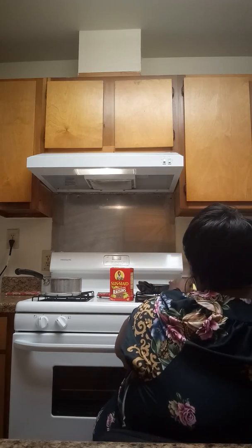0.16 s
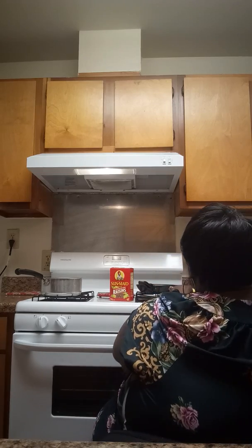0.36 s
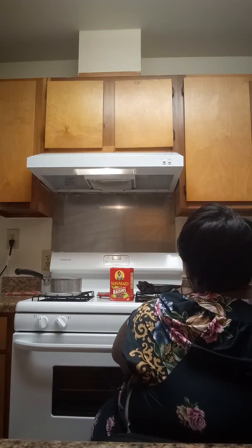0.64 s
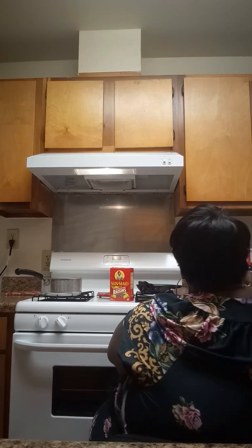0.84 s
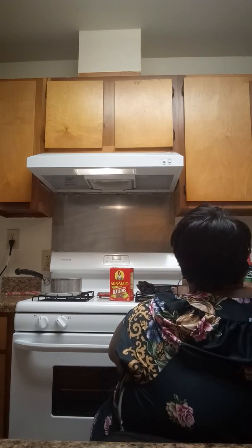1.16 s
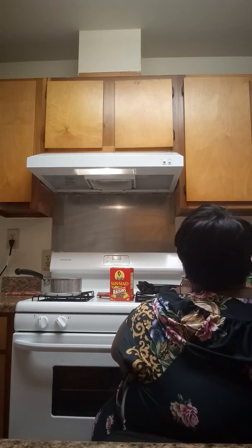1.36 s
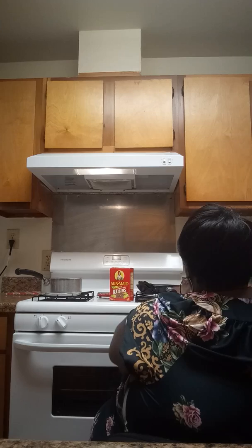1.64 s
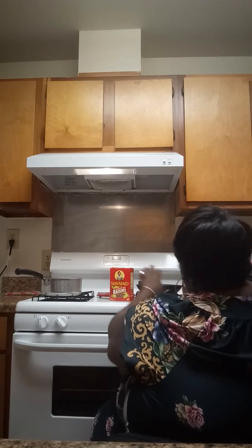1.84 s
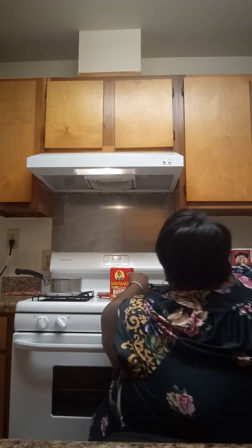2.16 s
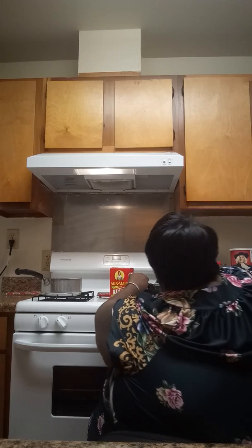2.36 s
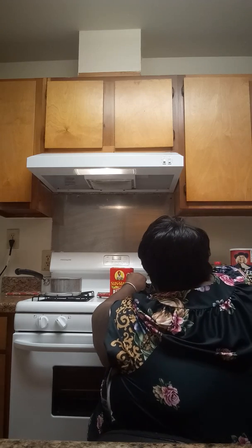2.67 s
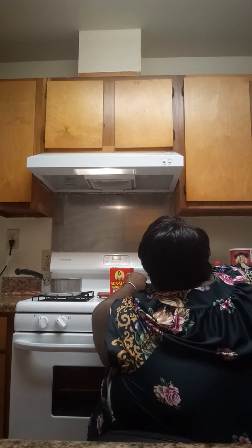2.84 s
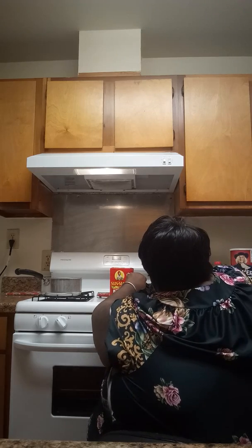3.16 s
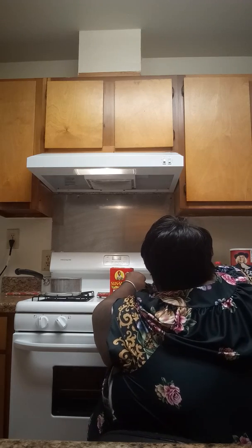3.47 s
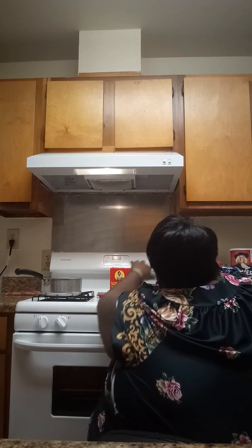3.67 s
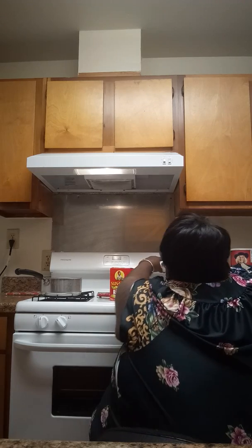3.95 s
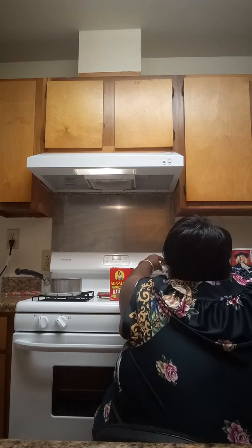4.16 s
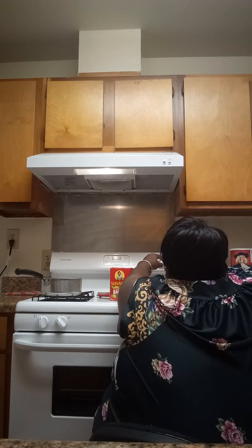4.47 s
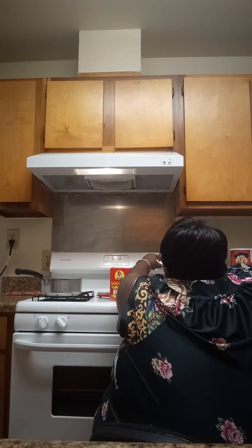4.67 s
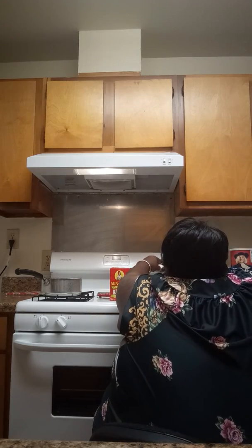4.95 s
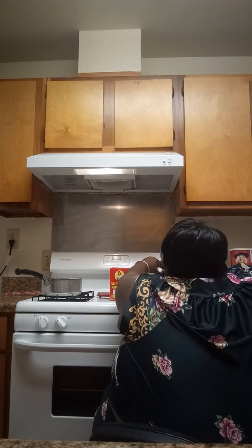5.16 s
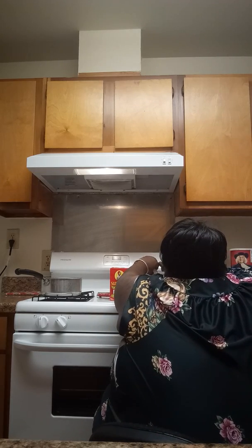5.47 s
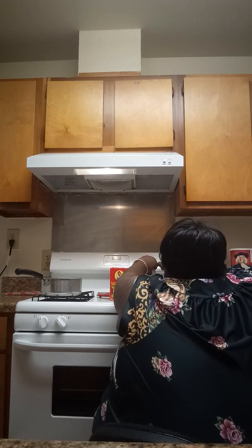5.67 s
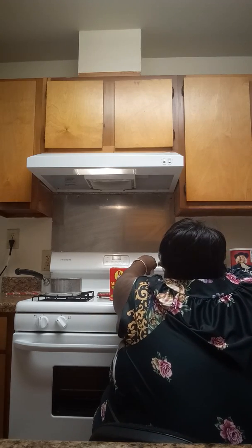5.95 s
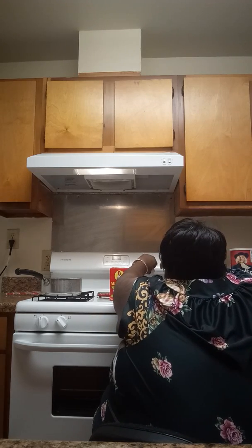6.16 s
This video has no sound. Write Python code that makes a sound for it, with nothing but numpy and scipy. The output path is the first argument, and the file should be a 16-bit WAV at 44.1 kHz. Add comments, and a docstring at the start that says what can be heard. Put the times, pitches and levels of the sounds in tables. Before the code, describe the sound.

In a small hard kitchen, a soft air rush and faint appliance hum run throughout. Light finger and shell taps lead to a sharp clink, then three groups of egg knocks crunch on a dish rim and make it ring briefly. The dish scrapes shortly, small ticks follow, and a bright grainy hiss sets in to the end. The microphone stands behind the cook, so cracks arrive softened and echoey.

```python
"""Eggs knocked on a dish rim

Eggs are handled and knocked on a dish on a stove in a small hard kitchen, heard from behind the cook. The body
screens the direct crack, which comes mostly by way of the echoes; struck modes of the dish swell up and ring.
Short noise spatters are taps of shell and fingers, and contacts of the dragged dish; short rings are ticks.
The dish is dragged in a train of slips, then a grainy noise hiss sets in. Below lie appliance hum and a soft
rush of noise; both channels are the same."""
import sys
import numpy as np
from scipy import signal
from scipy.fft import rfft, irfft
from scipy.io import wavfile

SR = 44100
rng = np.random.default_rng(int(sys.argv[2]) if len(sys.argv) > 2 else 0)


def master(y):
    """Save y as 16-bit WAV."""
    cut = np.clip(np.atleast_2d(y).T, -1, 1)
    pcm = np.round(cut * 32767)  # scale
    wavfile.write(sys.argv[1], SR, pcm.astype(np.int16))


N = 278491


def from_db(db):
    """Decibels to amplitude gain."""
    return 10 ** (np.asarray(db) / 20)


def rms_one(x):
    """Scale to rms 1."""
    return x / np.sqrt(np.mean(x ** 2) + 1e-20)


def in_time(rows):
    """Columns of a curve table, interpolated at every sample."""
    s, *columns = np.transpose(rows)
    return [np.interp(np.arange(N) / SR, s, column) for column in columns]


def at_hz(points, hz):
    """Read a table on a log-frequency axis."""
    table_hz, values = np.transpose(points)
    return np.interp(np.log(hz), np.log(table_hz), values)


def drift(rate_hz):
    """Slow random curve of rms 1: noise through two equal poles, on a grid of 40 samples."""
    r = np.exp(-80 * np.pi * rate_hz / SR)
    noise = rng.standard_normal(N // 40 + 2002)
    slow = signal.lfilter([1], [1, -2 * r, r * r], noise)[2000:]  # start-up dropped
    return np.interp(np.arange(N) / 40, np.arange(len(slow)), rms_one(slow))


def fade(start_s, rise_s):
    """Gain that rises exponentially from 0 towards 1 after a moment."""
    return 1 - np.exp(-np.maximum(np.arange(N) / SR - start_s, 0) / rise_s)


def colour(x, spectrum, unit_energy=True):
    """Causal minimum-phase filter with the given spectrum, by folding its cepstrum."""
    hz = np.maximum(np.arange(8193) * SR / 16384, 1)
    cepstrum = irfft(np.log(from_db(at_hz(spectrum, hz))))
    cepstrum[1:8192] *= 2
    cepstrum[8193:] = 0
    pulse = irfft(np.exp(rfft(cepstrum)))[:8192]
    if unit_energy:
        pulse = pulse / np.sqrt(np.sum(pulse ** 2))
    return signal.oaconvolve(x, pulse)[:N]


def split(x, hz):
    """Parts below and above a frequency."""
    return [signal.sosfilt(signal.butter(4, hz, kind, fs=SR, output="sos"), x) for kind in ("low", "high")]


def clicks(times_s, db):
    """Single-sample clicks of given levels."""
    out = np.zeros(N)
    out[np.round(np.asarray(times_s) * SR).astype(int)] = from_db(db)
    return out


def burst(x, length_s):
    """Each click becomes exponentially dying noise."""
    r = np.exp(-1 / (length_s * SR))
    return signal.lfilter([1], [1, -r], x + 1e-18) * rng.standard_normal(N)


def ring(x, hz, t60_s):
    """A damped mode: a unit click sets a sine of height 1 ringing."""
    r = from_db(-60 / (t60_s * SR))
    w = 2 * np.pi * hz / SR
    return signal.lfilter([0, np.sin(w)], [1, -2 * r * np.cos(w), r * r], x + 1e-18)


def resonance(x, hz, width_hz):
    """Two-pole band with gain 1 at its peak."""
    r = np.exp(-np.pi * width_hz / SR)
    top = np.array([1, 0, -1]) * (1 - r * r) / 2
    return signal.lfilter(top, [1, -2 * r * np.cos(2 * np.pi * hz / SR), r * r], x)


def narrow(hz, width_hz):
    """Noise through one damped mode; rms 1."""
    t60_s = np.log(1000) / (np.pi * width_hz)
    return rms_one(ring(rng.standard_normal(N), hz, t60_s))


def wavering(hz, width_hz, wander):
    """Noise band whose centre wanders by a share of its frequency; rms about 1."""
    phase = 2 * np.pi * np.cumsum(hz * (1 + wander * drift(2.5))) / SR
    return drift(width_hz) * np.cos(phase) + drift(width_hz) * np.sin(phase)


# Steady motor tones. Each row: frequency in Hz, mean level in dB rms.
MOTOR_TONES = [(59.5, -79), (151, -65)]
# Noisy motor bands. Each row: centre in Hz, width in Hz, level in dB rms.
MOTOR_BANDS = [(121, 6.9, -72.5), (721, 3, -62), (1413, 6.8, -58)]


def motor():
    """Appliance hum: sines drifting slightly in level and phase, plus narrow noise bands."""
    t = np.arange(N) / SR
    out = np.zeros(N)
    for hz, db in MOTOR_TONES:
        gain = np.sqrt(2) * from_db(db + 0.95 * drift(2.8))
        out += gain * np.sin(2 * np.pi * hz * t + 0.5 * drift(3.4))
    for hz, width_hz, db in MOTOR_BANDS:
        out += from_db(db) * narrow(hz, width_hz)
    return out


RUSH_DB, RUSH_TREBLE_DB, RUSH_SWAY_DB = -37, -1, 1.64
# Spectrum of the rush. Each row: frequency in Hz, relative density in dB per Hz.
RUSH_SPECTRUM = [(20, -37), (100, -26.5), (135, -12), (200, -5), (300, -8), (460, -1.5), (1100, -0.5),
                 (1500, 0), (2600, -5.5), (4600, 0.5), (6400, -3.5), (9000, -2.5), (16000, -4.5)]


def rush():
    """Air and appliance noise: shaped noise whose treble flickers in three bands."""
    low, high = split(colour(rng.standard_normal(N), RUSH_SPECTRUM), 2150)
    high, top = split(high, 16700)
    patch_1, rest = split(high, 3770)
    patch_2, patch_3 = split(rest, 4870)
    shared_db = 0.9 * drift(5)
    treble = sum(from_db(shared_db + 1.26 * drift(33)) * patch for patch in (patch_1, patch_2, patch_3))
    air = from_db(0.41 * drift(4.2)) * low
    air += from_db(RUSH_TREBLE_DB + RUSH_SWAY_DB * drift(1.0)) * treble
    air += from_db(0.4 * drift(8)) * top
    return from_db(RUSH_DB) * air


HISS_START_S, HISS_ATTACK_S, HISS_DB, HISS_FADE_DB_PER_S = 5.148, 0.018, -35, 5
# Hiss balance. Each row: time in s, treble in dB against the body, highest band in dB against the treble.
HISS_BALANCE = [(5.14, 6.5, 19), (5.2, 8.5, 3.5), (5.29, 12.5, -1.5), (5.4, 8, -6), (5.46, 4, -7),
                (5.52, 6, -4), (5.67, 7, 4), (6.0, 5.5, 4), (6.32, 2, 4.5)]
# Spectrum of the grainy noise. Each row: frequency in Hz, relative density in dB per Hz.
HISS_SPECTRUM = [(200, -31), (500, -30), (760, -17), (900, 6), (1120, -4.5), (1400, 0.5), (1800, 0),
                 (2700, -4.5), (3600, -2.5), (4700, 0.5), (6400, -0.5), (9000, -4), (16000, -1)]
# Hollow resonances. Each row: centre in Hz, width in Hz, level in dB against each other.
HISS_HOLLOWS = [(905, 53, -1.5), (1410, 71, 0), (1778, 42, 1), (2180, 110, -2.5), (3610, 200, 1.5),
                (4700, 240, 3), (6420, 180, -2)]


def hiss():
    """Escaping gas or steam: bright noise with hollow resonances that waver and flicker."""
    treble_db, top_db = in_time(HISS_BALANCE)
    body_db = HISS_DB - HISS_FADE_DB_PER_S * (np.arange(N) / SR - HISS_START_S)
    hollows = np.zeros(N)
    for hz, width_hz, db in HISS_HOLLOWS:
        hollows += from_db(db + 2.5 * drift(7.3)) * wavering(hz, width_hz, wander=0.03)
    noise = colour(rng.standard_normal(N), HISS_SPECTRUM)
    body, treble = split(noise + from_db(-17) * hollows, 3200)
    treble, top = split(rms_one(treble), 7800)
    jet = rms_one(body) + from_db(treble_db + 0.5 * drift(7.1)) * (treble + from_db(top_db) * top)
    level = from_db(body_db + 0.41 * drift(13.4) + 0.23 * drift(70))
    return level * jet * fade(HISS_START_S, HISS_ATTACK_S)


DRAG_ATTACK_S, DRAG_RELEASE_S, JUDDER_HZ, JUDDER_DB = 0.0045, 0.017, 37.1, 2.5
# Drag of the dish. One row: start in s, stop in s, level in dB rms before judder and fades.
DRAG_STROKE = (3.70, 3.955, -34)
# Spectrum of the drag. Each row: frequency in Hz, relative density in dB per Hz.
DRAG_SPECTRUM = [(210, -27), (450, -10.5), (800, -1), (1230, -6.5), (1650, 1.5), (2800, -16.5), (5240, -19),
                 (16000, -22)]


def drag():
    """Dense uneven slips of the dish foot on enamel, their level swung by an unsteady judder."""
    start_s, stop_s, db = DRAG_STROKE
    sizes = from_db(2.5 * np.minimum(rng.exponential(1, N), 4))
    struck = rng.random(N) < 2500 / SR  # 2500 slips per second on average
    slips = struck * sizes * rng.choice([-1, 1], N)
    judder = np.sin(2 * np.pi * np.cumsum(JUDDER_HZ * (1 + 0.206 * drift(7.9))) / SR)
    stroke = fade(start_s, DRAG_ATTACK_S) * (1 - fade(stop_s, DRAG_RELEASE_S))
    return from_db(db + JUDDER_DB * judder) * stroke * rms_one(colour(slips, DRAG_SPECTRUM))


TICK_OVERTONE_RATIO, OVERTONE_DB = 1.68, -4
# Hard little ticks. Each row: time in s, note in Hz, level of the note in dB, t60 in s,
# echo feed in dB against the direct tick.
TICK_NOTES = [(2.04, 1862, -21, .2, -17), (2.043, 6510, -22, 0.027, -13), (4.181, 4930, -26, 0.0066, -3),
              (4.940, 1400, -23.5, 0.0099, 6), (4.998, 1020, -32, 0.054, -6), (5.102, 1243, -28, 0.1, -11),
              (6.2621, 1900, -17.5, 0.017, -23)]


def ticks():
    """Clicks ring a note and a faster-dying overtone; returns direct sound and echo feed."""
    out = np.zeros((2, N))
    for at_s, hz, db, t60_s, echo_db in TICK_NOTES:
        blow = clicks([at_s], db)
        note = ring(blow, hz, t60_s)
        note += from_db(OVERTONE_DB) * ring(blow, hz * TICK_OVERTONE_RATIO, t60_s / 3.4)
        note = split(note, hz / 2)[1]
        out += note * from_db([[0], [echo_db]])
    return out


TAP_WIDTH_SHARE = 0.38  # band width over centre
TAP_ECHO_DB, SNAP_ECHO_DB = -9, -7.5  # what reaches the walls
# Short noise spatters: taps of shell and fingers, and contacts of the dragged dish.
# Each row: start in s, peak in dB, centre in Hz, time to the envelope's crest in s,
# broad snap in dB against the peak.
TAP_EVENTS = [(0.948, -32.5, 1780, 0.02, -6.5), (1.224, -38.5, 3030, 0.047, -8),
              (1.282, -32.5, 1770, 0.013, 2.5), (1.328, -33, 4500, 0.0064, -12),
              (2.017, -26.5, 1990, 0.009, -4), (2.035, -13, 1740, 0.01, -12.5),
              (2.037, -16, 2840, 0.009, -11), (2.381, -31, 1250, 0.0093, -9), (3.717, -32, 3240, .006, -19),
              (3.835, -33, 4500, 0.0034, -14), (3.918, -38, 4300, 0.0049, 2),
              (3.921, -30, 1090, 0.0072, -15), (4.184, -30, 5160, 0.0073, -19),
              (4.459, -35, 5500, 0.0055, -9), (4.549, -28, 5500, 0.0033, -16),
              (4.577, -37.5, 1610, 0.013, 5.5), (4.779, -30, 4940, 0.01, -20),
              (4.939, -26, 1800, 0.004, -4), (5, -34.5, 1210, 0.0067, 0.5)]
# Spectrum of the snap. Each row: frequency in Hz, relative density in dB per Hz.
SNAP_SPECTRUM = [(300, -20), (600, -30), (900, -6.5), (1850, -3.5), (3000, -5.5), (5500, -4.5), (9000, -7),
                 (16000, -17)]


def taps():
    """Short contacts: noise spatters in a hollow band plus a broad snap; returns direct and echo feed."""
    notes, snaps = np.zeros(N), np.zeros(N)
    t = np.arange(4000) / SR
    for at_s, db, hz, crest_s, snap_db in TAP_EVENTS:
        spatter = rng.standard_normal(len(t)) * t / crest_s * np.exp(1 - t / crest_s)
        width_hz = TAP_WIDTH_SHARE * hz
        note = resonance(resonance(spatter, hz, width_hz), hz, 2 * width_hz)
        first = round(at_s * SR)
        where = slice(first, first + len(t))
        notes[where] += from_db(db) * note / np.abs(note).max()
        snaps[where] += from_db(db + snap_db) * spatter
    snaps = colour(snaps, SNAP_SPECTRUM)
    return notes + snaps, from_db(TAP_ECHO_DB) * notes + from_db(SNAP_ECHO_DB) * snaps


THUD_DB = -25.5  # against the knock


def thud():
    """Each blow shakes the stove and worktop: a faint low noise rumble that dies slowly."""
    s, db, _, _ = np.transpose(BLOWS)
    return split(burst(clicks(s, db + THUD_DB), length_s=0.18), 220)[0]


CONTACT_DB, CONTACT_HZ = -9.5, 620  # level against the knock


def contact():
    """First dull touch of egg on rim: one short mode, heard before the ring has built up."""
    s, db, _, _ = np.transpose(BLOWS)
    return ring(clicks(s, db + CONTACT_DB), CONTACT_HZ, t60_s=0.03)


CRACK_S, CRACK_DELAY_S = 0.007, 0.003
# Egg on the dish rim. Each row: time in s, ring in dB, shell crack in dB against the ring,
# ring tilt in dB per octave about 1 kHz.
BLOWS = [(2.525, -20.5, 6.5, -3), (2.548, -25.5, 3, 2.5), (2.746, -15.5, 5.5, -0.5), (2.794, -26, 13, 9),
         (2.816, -25, 9.5, -8.5), (3.049, -14.5, 5.5, 0), (3.122, -20.5, 14, 6.5), (3.150, -20.5, -8, -4)]
# Modes of the dish and the stove top under it. Each row: frequency in Hz, strength in dB, t60 in s.
DISH_MODES = [(123.6, -29, 0.19), (363, -16.5, 0.14), (462.4, -24, 0.53), (565, -22, 0.12),
              (642, -22, 0.33), (700, -28, 0.15), (808.2, 7, 0.22), (819, -3.5, 0.19), (896, -6, 0.2),
              (1113, 7, 0.07), (1200, -24, 0.45), (1300, -13.5, 0.31), (1364, -11, 0.16), (1405, -4, 0.22),
              (1520, -11.5, 0.18), (1747, -19, 0.5), (1860, -19, 0.32), (2090, -29, .25),
              (2208, -17.5, 0.28), (2350, -22, 0.25), (3420, -16.5, 0.12), (3610, -17, 0.12),
              (5530, -21, 0.063), (5900, -17.5, 0.08)]
# Spectrum of shell giving way. Each row: frequency in Hz, relative density in dB per Hz.
CRACK_SPECTRUM = [(150, -68), (250, -36), (370, -13), (750, -7.5), (1400, -1), (2200, -9.5), (2900, -17),
                  (5700, -15.5), (9000, -17), (16000, -32)]


def knocks():
    """Each blow strikes every mode with a strength of its own; returns swelling ring and shell crack."""
    s, db, crack_db, tilt_db = np.transpose(BLOWS)
    rings = np.zeros(N)
    for hz, mode_db, t60_s in DISH_MODES:
        octaves = np.log2(max(hz, 500) / 1000)  # no further tilt below 500 Hz
        uneven_db = 1.2 * rng.standard_normal(len(s))
        blows = clicks(s, db + mode_db + tilt_db * octaves + uneven_db)
        swell_hz = 35 + 0.019 * hz  # echoes pile up in step, so the ring builds after contact
        mode = ring(blows, hz, t60_s)
        rings += resonance(resonance(mode, hz, swell_hz), hz, swell_hz)
    crack = burst(clicks(s + CRACK_DELAY_S, db + crack_db), length_s=CRACK_S)
    return rings, colour(crack, CRACK_SPECTRUM)


SWELL_S = 0.0042
# Decay of the room. Each row: frequency in Hz, t60 in s.
ROOM_DECAY = [(300, 0.81), (1000, 0.55), (3000, 0.47), (8000, 0.27), (15000, 0.22)]


def kitchen(x):
    """Room echoes: half-octave noise bands swell for some milliseconds, then die, the treble first."""
    t = np.arange(1, SR // 2) / SR
    echoes = np.zeros(len(t))
    edges_hz = 200 * 2 ** np.arange(0, 6.6, 0.5)
    for low_hz, high_hz in zip(edges_hz, edges_hz[1:]):
        band_filter = signal.butter(2, [low_hz, high_hz], "band", fs=SR, output="sos")
        band = signal.sosfilt(band_filter, rng.standard_normal(len(t)))
        t60_s = at_hz(ROOM_DECAY, np.sqrt(low_hz * high_hz))
        echoes += band * from_db(-60 * t / t60_s)
    echoes *= 1 - np.exp(-(t / SWELL_S) ** 1.9)
    return signal.oaconvolve(x, echoes / np.sqrt(np.sum(echoes ** 2)))[:N]


RING_ECHO_DB, CRACK_DIRECT_DB, CRACK_ECHO_DB, DRAG_ECHO_DB = -7, -15, 2, -9.5


def scene():
    """Sum of direct sources, background and wall echoes, the same in both channels."""
    rings, crack = knocks()
    tap, tap_feed = taps()
    tick, tick_feed = ticks()
    slide, touch = drag(), contact()
    feed = from_db(RING_ECHO_DB) * rings + from_db(CRACK_ECHO_DB) * crack
    feed += tap_feed + tick_feed + touch + from_db(DRAG_ECHO_DB) * slide
    direct = rings + touch + from_db(CRACK_DIRECT_DB) * crack + tap + tick + slide
    mono = kitchen(feed) + direct + hiss() + rush() + motor() + thud()
    return np.array([mono, mono])


CUTOFF_HZ = 15500
# Microphone: flat, steeply dull above the presence range, a port resonance at the top.
# Each row: frequency in Hz, gain in dB.
MICROPHONE_RESPONSE = [(5800, 0), (6600, -1), (7200, -10.5), (8300, -20), (10500, -24), (13700, -29),
                       (14800, -20.5), (15600, -19)]


def record(dry):
    """The microphone colours the sound, then a steep low-pass cuts the top."""
    heard = [colour(channel, MICROPHONE_RESPONSE, unit_energy=False) for channel in dry]
    return signal.sosfilt(signal.ellip(12, 0.5, 70, CUTOFF_HZ, fs=SR, output="sos"), heard)


dry = scene()
out = record(dry)
master(out)
```